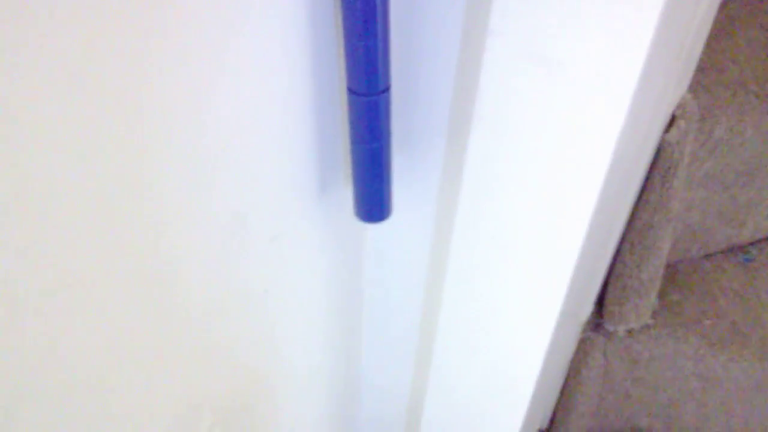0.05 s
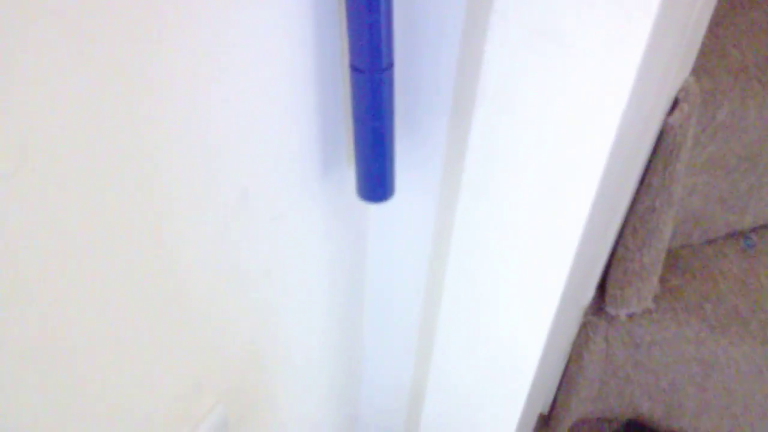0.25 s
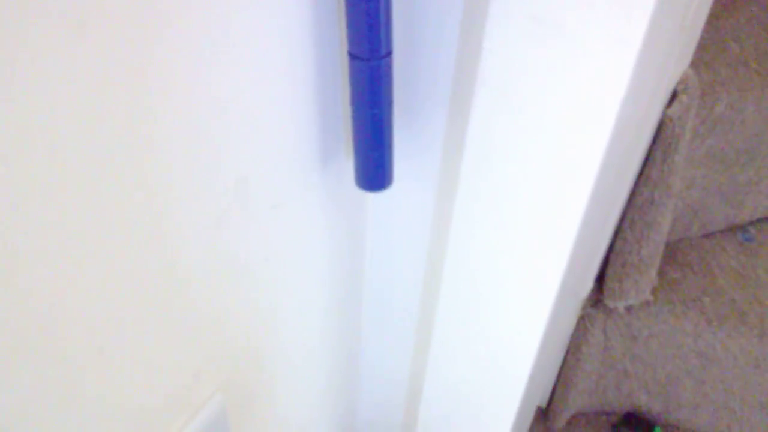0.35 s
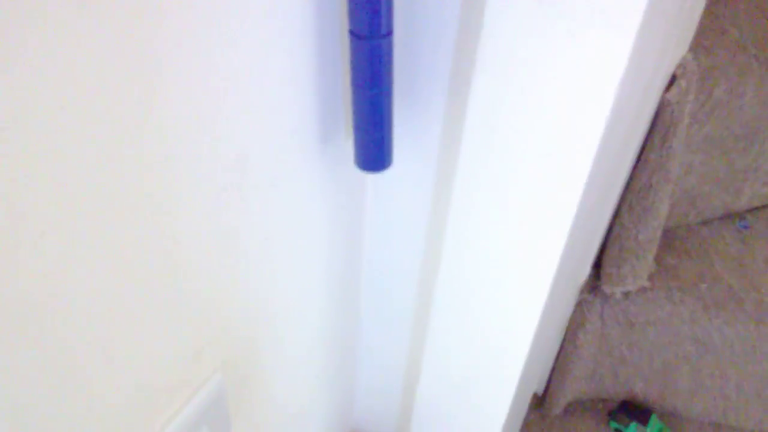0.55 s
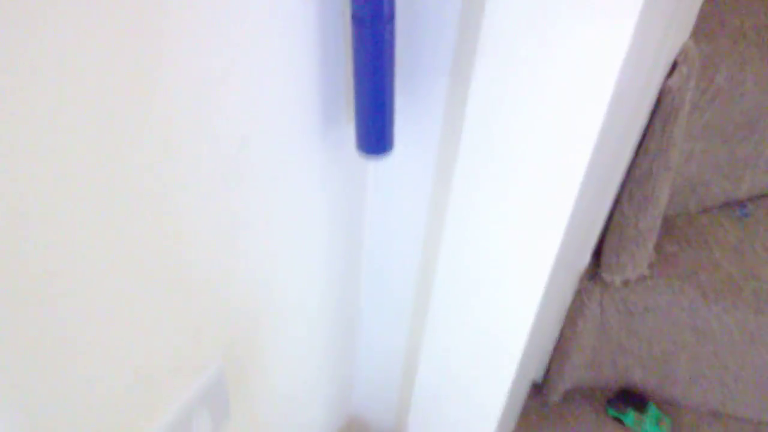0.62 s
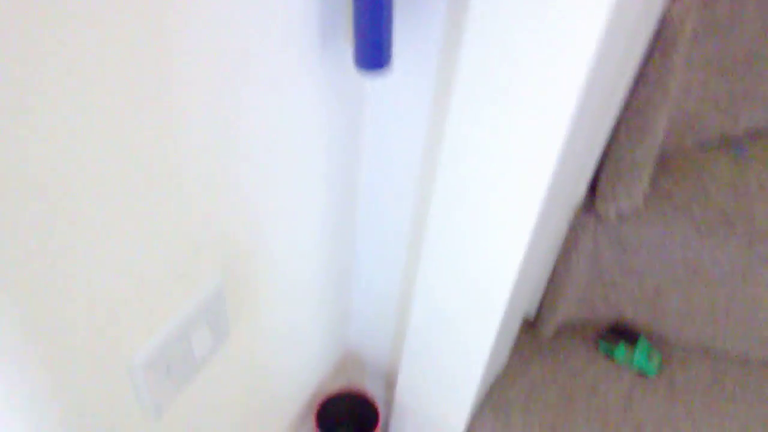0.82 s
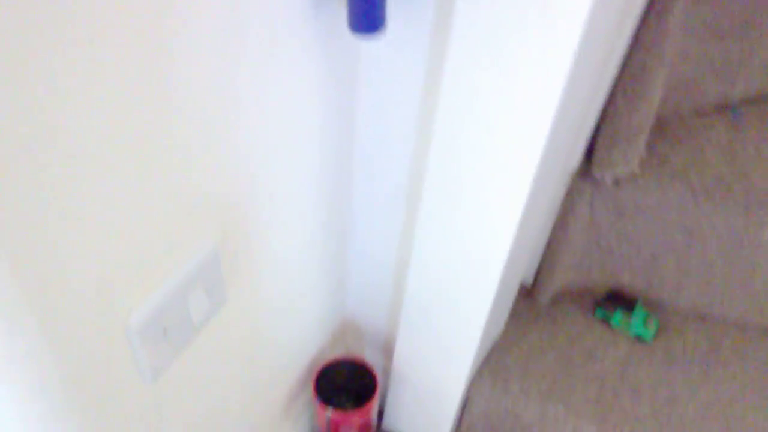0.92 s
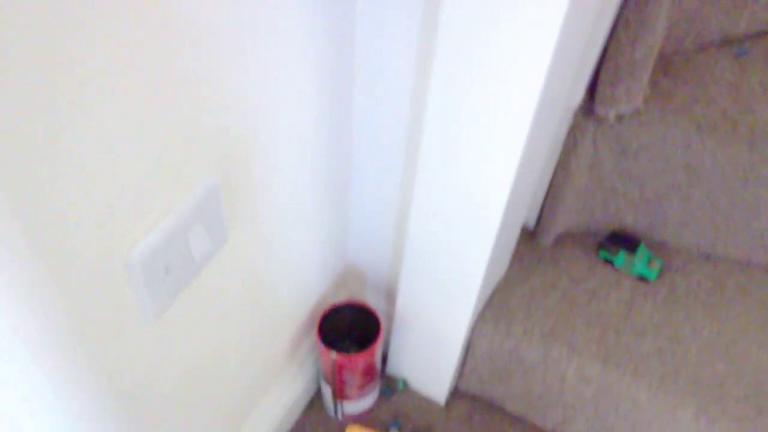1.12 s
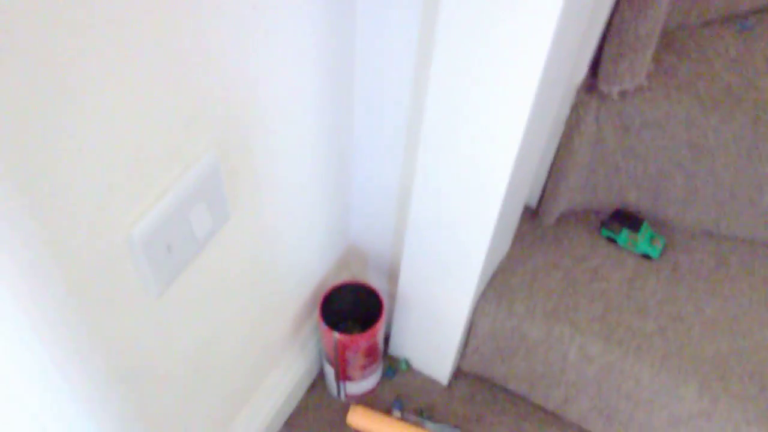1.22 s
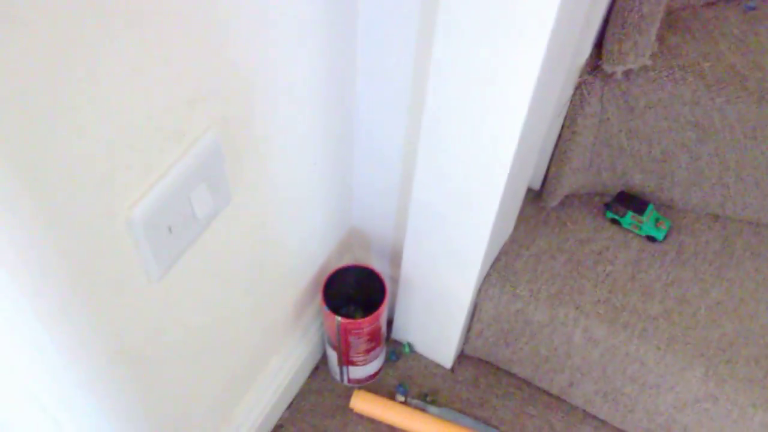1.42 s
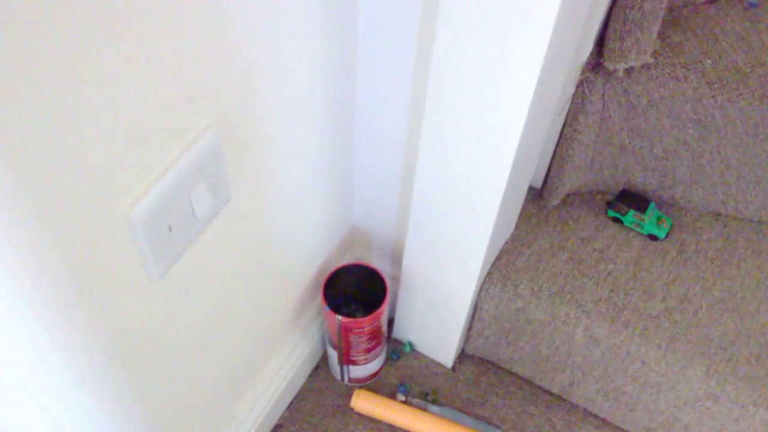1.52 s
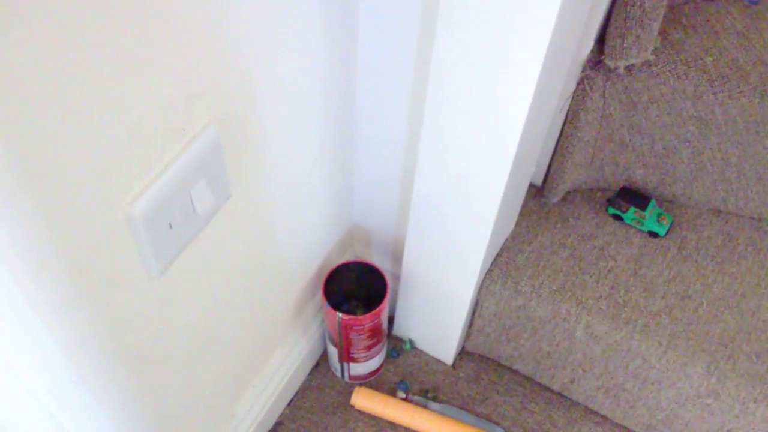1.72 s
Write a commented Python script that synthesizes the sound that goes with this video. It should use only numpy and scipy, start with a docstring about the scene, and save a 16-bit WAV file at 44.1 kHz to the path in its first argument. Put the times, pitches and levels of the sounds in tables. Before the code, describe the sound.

A marble clatters into a tin can, between knocks and rolling in a plastic tube.

```python
"""First, marbles knock and roll in a plastic tube, with brief squeaks.
Then one drops into a tin can below, at the foot of carpeted stairs: it thumps the base
and rattles round the wall. After that, the knocking and rolling in the tube start again.
All along, the narrow hallway adds a short bright echo over a faint hum."""
import sys
import numpy as np
from scipy import signal
from scipy.fft import rfft, irfft
from scipy.io import wavfile

SR = 44100
rng = np.random.default_rng(int(sys.argv[2]) if len(sys.argv) > 2 else 0)


def unload_audio(sound):
    """Save the sound as a 16-bit wav file, at the path given as the first command line argument."""
    columns = np.transpose(np.atleast_2d(sound))
    # keep every value between -1 and 1, then stretch to whole-number steps
    steps = np.round(np.clip(columns, -1, 1) * 32767)
    wavfile.write(sys.argv[1], SR, steps.astype(np.int16))


N = 77175
T = np.arange(N) / SR
EVENT_SAMPLES = 16384


def gain(db):
    """Turn decibels into a number to multiply by."""
    return 10 ** (np.asarray(db) / 20)


def normalise(x):
    """Scale a sound to an average strength (rms) of 1."""
    return x / np.sqrt(np.mean(x ** 2) + 1e-18)


def colour(x, spectrum, treble_db=0):
    """Shape a sound by (pitch_hz, level_db) points, normalise it, then turn its treble up or down."""
    hz = np.arange(len(x) // 2 + 1) * SR / len(x) + 1e-3
    pitch_hz, level_db = np.array(spectrum, float).T
    curve_db = np.interp(np.log(hz), np.log(pitch_hz), level_db)
    shaped = normalise(irfft(rfft(x) * gain(curve_db), len(x)))
    treble_share = 1 / (1 + (7500 / hz) ** 6)  # treble starts near 7500 Hz
    return irfft(rfft(shaped) * gain(treble_db * treble_share), len(x))


def noise(spectrum, treble_db=0, size=EVENT_SAMPLES):
    """Random hiss shaped by a spectrum."""
    return colour(rng.standard_normal(size), spectrum, treble_db)


def fade(fade_s, size=EVENT_SAMPLES):
    """Die away by 60 dB in fade_s seconds."""
    return np.exp(-np.log(1000) * T[:size] / fade_s)


def swell(length_s):
    """Rise and fall once, as half a sine wave."""
    return np.sin(np.pi * np.clip(T[:EVENT_SAMPLES] / length_s, 0, 1))


def ring(tones, spread_db=2.5, detune=0.0026):
    """The fading tones of a struck object; each spot that is hit sounds a little different."""
    out = np.zeros(EVENT_SAMPLES)
    for k, (hz, db, fade_s) in enumerate(tones):
        level_shift, pitch_shift = rng.standard_normal(2)
        tone = np.sin(2 * np.pi * hz * (1 + detune * pitch_shift) * T[:EVENT_SAMPLES])
        direction = (-1) ** k  # neighbouring tones swing opposite ways
        out += direction * gain(db + spread_db * level_shift) * fade(fade_s) * tone
    return out


def add(out, start_s, sound):
    """Mix a sound in at its start time."""
    i = int(np.clip(start_s * SR, 0, N - 1))
    out[i:i + len(sound)] += sound[:N - i]


# Hiss of the indoor air: pitch_hz, level_db
AIR_SPECTRUM = [(25, -18.5), (65, -13.5), (110, -24), (210, 9.5), (350, -2.5), (800, 7.5), (2000, -4),
                (5500, -12), (8000, -36), (17000, -38)]
# Dull thud of a bump: pitch_hz, level_db
BUMP_SPECTRUM = [(60, -22), (120, -23), (160, 7), (230, -3), (300, -26.5), (420, -3.5), (600, -35),
                 (2000, -58)]
# Soft bumps: start_s, length_s, rumble_db, thud_db
BUMPS = [(.05, 0.1, -66, -87), (.69, 0.15, -66, -59), (1.06, 0.09, -63, -55.5), (1.13, 0.12, -67.5, -63),
         (1.46, .26, -61.5, -72)]

def house(hum_hz=66):
    """Still indoor air, a low wavering hum and soft bumps of handling."""
    hum = [(hum_hz / 2, -60), (hum_hz * 0.93, -12), (hum_hz, 0), (hum_hz * 1.3, -12), (hum_hz * 2, -70)]
    out = gain(-61.5) * noise(AIR_SPECTRUM, size=N) + gain(-79.5) * noise(hum, size=N)
    for start_s, length_s, rumble_db, thud_db in BUMPS:
        bump = gain(rumble_db) * noise(hum) + gain(thud_db) * noise(BUMP_SPECTRUM)
        add(out, start_s, swell(length_s) * bump)
    return out


# How long the echo lasts, from bass to treble: pitch_hz, fade_s
ECHO_FADES = [(200, 0.9), (550, 0.58), (1000, 0.32), (2500, 0.36), (6200, 0.34), (7500, 0.3), (11500, 0.27),
              (15000, 0.21)]

def hallway_echo(sound, build_s=0.0017, size=32768):
    """Close walls throw back a blur of echoes; the treble dies first."""
    pitch_hz, fades_s = np.array(ECHO_FADES).T
    hiss_spectrum = rfft(rng.standard_normal(size))
    log_hz = np.log(np.arange(len(hiss_spectrum)) * SR / size + 1)
    tail = np.zeros(size)
    for band, fade_s in zip(np.eye(len(pitch_hz)), fades_s):
        band_share = np.interp(log_hz, np.log(pitch_hz), band)
        tail += irfft(hiss_spectrum * band_share) * fade(fade_s, size)
    tail *= 1 - np.exp(-T[:size] / build_s)
    return signal.fftconvolve(sound, tail / np.sqrt(np.sum(tail ** 2)))[:N]


# Squeaks of rubbed plastic: start_s, length_s, start_hz, end_hz, level_db
SQUEAKS = [(0, 0.015, 1990, 1956, -35.5), (.046, 0.022, 3195, 3160, -32.5), (0.059, 0.071, 3173, 3157, -43),
           (0.643, 0.0184, 4010, 3770, -33.5), (0.754, 0.077, 1850, 1942, -46),
           (1.011, 0.027, 3264, 2810, -32.5), (1.021, 0.043, 4080, 4090, -45),
           (1.013, 0.042, 6050, 5740, -47), (1.043, 0.036, 3010, 3045, -34.5),
           (1.051, .009, 4180, 4120, -32), (1.056, 0.0096, 13200, 12470, -37),
           (1.327, 0.016, 5040, 4930, -50), (1.412, 0.038, 1691, 1393, -35.5),
           (1.41, 0.032, 4250, 4480, -41), (1.446, 0.072, 1622, 1691, -31.5),
           (1.503, .035, 1669, 1664, -32.5)]

def tube_squeaks(wobble_hz=300, wobble_depth=0.023):
    """Plastic sticks and slips, making short, unsteady, sliding tones."""
    out = np.zeros(N)
    for start_s, length_s, start_hz, end_hz, db in SQUEAKS:
        wobble = noise([(wobble_hz, 0), (wobble_hz * 2, -20), (wobble_hz * 10, -70)])
        slide_hz = np.interp(T[:EVENT_SAMPLES], [0, length_s], [start_hz, end_hz])
        hz = slide_hz * (1 + wobble_depth * wobble)
        add(out, start_s, gain(db) * swell(length_s) * np.sin(2 * np.pi * np.cumsum(hz) / SR))
    return out


# Tones of the tube's wall and air, shared with the knocks: pitch_hz, level_db, fade_s
TUBE_TONES = [(1258, -5, 0.12), (1492, -7.5, 0.083), (1632, -7, 0.06), (1757, -4, 0.033), (1870, 3, 0.041),
              (1977, 6, 0.073), (2417, 4.5, .1), (2865, -8, 0.16), (3430, -39.5, 0.091)]
# Click of glass on plastic, shared with the knocks: pitch_hz, level_db
CLICK_SPECTRUM = [(60, -50), (200, -15.5), (400, -15.5), (800, -16.5), (1050, -7), (1700, -2.5),
                  (3000, 0.5), (4200, 2), (5300, -8.5), (6300, -5.5), (7800, -17.5), (12500, -28),
                  (17000, -37)]
# Hollow drone of the tube: pitch_hz, level_db
DRONE_SPECTRUM = [(150, -23.5), (450, -20), (800, -12), (1150, -19), (1450, -1), (1700, 1), (2000, -5),
                  (2400, -13), (4000, -32.5), (9000, -71.5)]
# How the rolling grows and fades: time_s, drone_db, rattle_db
ROLL_LEVELS = [(0, -43.5, -38), (0.041, -48.5, -43.5), (.06, -50, -34.5), (.15, -58.5, -83),
               (.22, -62, -65), (.58, -55, -53.5), (0.629, -44.5, -47.5), (.69, -44, -38),
               (.73, -38, -34.5), (.815, -44.5, -47), (.87, -60, -82), (1.0, -57, -68), (1.07, -41.5, -41),
               (1.14, -47, -47), (1.209, -41.5, -46), (1.309, -49, -57), (1.37, -52, -42.5),
               (1.439, -38.5, -40.5), (1.478, -43, -25), (1.51, -43, -40.5), (1.56, -53, -54),
               (1.6, -70, -73), (1.636, -34.5, -41), (1.688, -60, -80), (1.75, -48, -91)]

def tube_rolling(taps_per_s=2700, spread_db=1, ring_share=0.45):
    """A rolling marble makes many tiny taps that rattle the tube and keep it droning."""
    time_s, drone_db, rattle_db = np.array(ROLL_LEVELS).T
    taps = (rng.random(N) < taps_per_s / SR) * rng.choice([-1, 1], N)
    taps = taps * gain(spread_db * np.minimum(rng.exponential(size=N), 4))
    ringing = normalise(signal.fftconvolve(taps, ring(TUBE_TONES))[:N])
    drone = normalise(colour(taps, DRONE_SPECTRUM) + ring_share * ringing)
    drone *= gain(np.interp(T, time_s, drone_db) - 4)
    rattle = colour(taps, CLICK_SPECTRUM) * gain(np.interp(T, time_s, rattle_db) - 6)
    return drone + rattle


# Low "tock" of the air inside the tube: pitch_hz, level_db, fade_s
TOCK_TONES = [(640.6, -2, 0.051), (767, -3.5, 0.072), (835, -3, 0.075), (925, -4, 0.053)]
# Marbles hitting the tube: start_s, level_db, hollow_db, tock_db, treble_db
TUBE_KNOCKS = [(.001, -11, -9, 3, 14.5), (0.0502, -1.5, -24, -29, 3), (.064, -10, -34, -14, -8),
               (.082, -7, -20, -14, -1), (0.1, -11.5, -11, -17, -26), (.124, -14, -2, -6, -26),
               (.6455, 1, -31, 2.5, 2.5), (.7005, -1.5, 8, 2, 4.5), (.7065, 0, -24, -18, 7),
               (.724, -2.5, -28, -7, 10.5), (0.766, -8, 7.5, -11, -0.5), (.9765, -21.5, -3, 11.5, -24.5),
               (1.014, -3, -0.5, -3, -7), (1.0207, -5.5, 3.5, -6, -1), (1.0372, -3.5, -8, -17, 3.5),
               (1.0551, -2.5, -22, 7.5, 10), (1.073, -2, 7.5, -5, -3), (1.092, -8, -13, 6, 8),
               (1.1632, -11.5, 9.5, -5, 0), (1.175, -5, 0, -15, -8), (1.386, -3.5, 5, -18, 3),
               (1.475, 2, -4, 0.5, -32), (1.485, 0, -24, 1.5, -39), (1.518, -6.5, -11, 4.5, -5),
               (1.554, -2.5, -1, 5, 4), (1.615, -4, 2.5, 0.5, -1), (1.636, -8.5, -5, 11.5, 9),
               (1.6657, -3.5, 3.5, 7.5, 0)]

def tube_knocks(contact_s=0.0019):
    """Glass clicks softly on the plastic tube, which answers with a hollow tone and a low tock."""
    out = np.zeros(N)
    soft_start = np.minimum(T[:EVENT_SAMPLES] / contact_s, 1)
    for start_s, db, hollow_db, tock_db, treble_db in TUBE_KNOCKS:
        click = gain(-29) * noise(CLICK_SPECTRUM, treble_db) * fade(fade_s=0.076)
        hollow = gain(hollow_db - 39.5) * ring(TUBE_TONES)
        tock = gain(tock_db - 45) * ring(TOCK_TONES)
        add(out, start_s, gain(db) * (click + hollow + tock) * soft_start)
    return out


# Tones of the can's hollow, base and wall: pitch_hz, level_db, fade_s
HOLLOW_TONES = [(507, -8, 0.021), (570, -1.5, 0.028), (658, -2, 0.021), (788, -3.5, 0.028)]
BASE_TONES = [(975, -2.5, 0.016), (1068, 2, 0.034), (1134, 0, 0.03), (1290, -1.5, 0.023)]
WALL_TONES = [(2127, 7.5, 0.051), (2578, 0.5, 0.11), (2826, -3.5, 0.33), (2763, -12, 0.36),
              (2803, 11.5, 0.053), (2910, 5, .14), (2924, 6, 0.047), (3904, -7.5, 0.35), (3900, -4, 0.27),
              (4520, -14, 0.33), (4650, -26, 0.1), (5200, -5, 0.26), (6180, -4.5, 0.37),
              (6430, -12.5, 0.43)]
# Crash of the thin metal, thud of the floor and zing of a skid: pitch_hz, level_db
CRASH_SPECTRUM = [(200, -47.5), (380, -10), (550, -11), (1500, -3), (2300, 1), (3500, 2.5), (6500, 0.5),
                  (8200, -8), (11500, -10), (17000, -23.5)]
FLOOR_SPECTRUM = [(25, -3.5), (50, 0), (120, -2), (250, 4), (450, 1.5), (900, -16), (3000, -62)]
SKID_SPECTRUM = [(1500, -35), (3000, -11), (3700, -1), (4500, 1.5), (5400, -11), (12000, -30.5)]
# The marble hitting the can: start_s, level_db, hollow_db, base_db, wall_db, treble_db
CAN_HITS = [(0.2269, -0.5, 8.5, 9.5, 0.5, -3.5), (.2312, -1.5, -12, -10, 7, -2),
            (.2375, 0.5, -15, -29, -3, 3), (.252, -8, -2.5, -12, -15.5, 11.5), (0.275, -6, -28, -5, 1, 4.5),
            (.287, -7, -6, -8, 1, 6.5), (0.319, -11, -27, 6.5, -7, 5), (0.3452, -9.5, -6, 3, -9, 0.5),
            (0.368, -22, -17, 4, -25, 6), (0.3971, -9.5, -7, -3.5, -17, -1), (.409, -24, -4, 1, -15, 13),
            (0.4242, -17, 0, -0.5, -12, 5), (0.438, -16.5, -7, -2, -12, 2),
            (0.4736, -24, -8, -19, -2.5, -9)]
# The marble skidding round the wall: start_s, length_s, level_db
CAN_SKIDS = [(0.223, 0.016, -25.5), (0.306, 0.022, -22.5), (.329, 0.018, -25)]

def tin_can(lowest_hz=452):
    """Each hit shakes the can's metal and air, and thuds faintly through the carpet; skids add a zing."""
    tin, floor = np.zeros(N), np.zeros(N)
    for start_s, db, hollow_db, base_db, wall_db, treble_db in CAN_HITS:
        crash = gain(-16) * noise(CRASH_SPECTRUM, treble_db) * fade(fade_s=0.094)
        boom = gain(hollow_db - 19) * ring(HOLLOW_TONES)
        knock = gain(base_db - 21) * ring(BASE_TONES)
        clang = gain(wall_db - 29.5) * ring(WALL_TONES)
        add(tin, start_s, gain(db) * (crash + boom + knock + clang))
        add(floor, start_s, gain(db - 55) * noise(FLOOR_SPECTRUM) * fade(fade_s=0.2))
    for start_s, length_s, db in CAN_SKIDS:
        add(tin, start_s, gain(db) * noise(SKID_SPECTRUM) * swell(length_s))
    # The can is too small to give off bass.
    bass_cut = signal.butter(8, lowest_hz, "high", fs=SR, output="sos")
    return floor + signal.sosfilt(bass_cut, tin)


def scene():
    """The can and the tube sound in the hallway; the plastic muffles the tube's highest treble."""
    can = tin_can()
    muffle = signal.butter(3, 13500, fs=SR, output="sos")
    tube = signal.sosfilt(muffle, tube_knocks() + tube_rolling() + tube_squeaks())
    echo = hallway_echo(gain(-9.5) * can + gain(-5.5) * tube)
    return (can + tube + echo + house())[None]


def record(dry):
    """Flatten the tallest peaks and cut the very highest treble."""
    ceiling, top_hz = 0.68, 17500
    treble_cut = signal.ellip(10, 0.2, 80, top_hz, fs=SR, output="sos")
    return signal.sosfilt(treble_cut, np.clip(dry, -ceiling, ceiling))


dry = scene()
out = record(dry)
unload_audio(out)
```